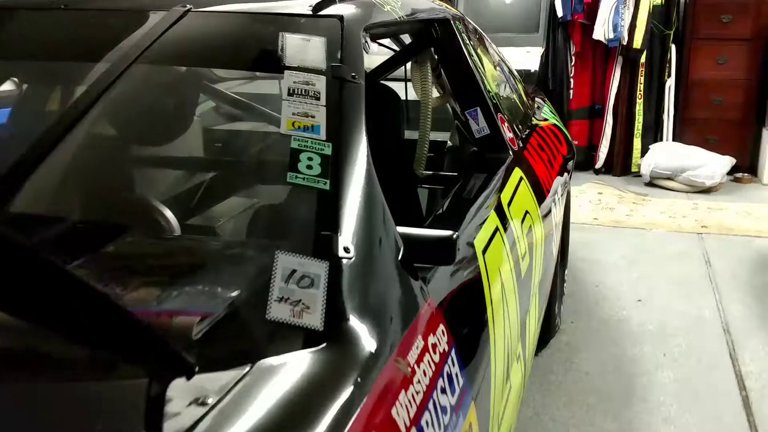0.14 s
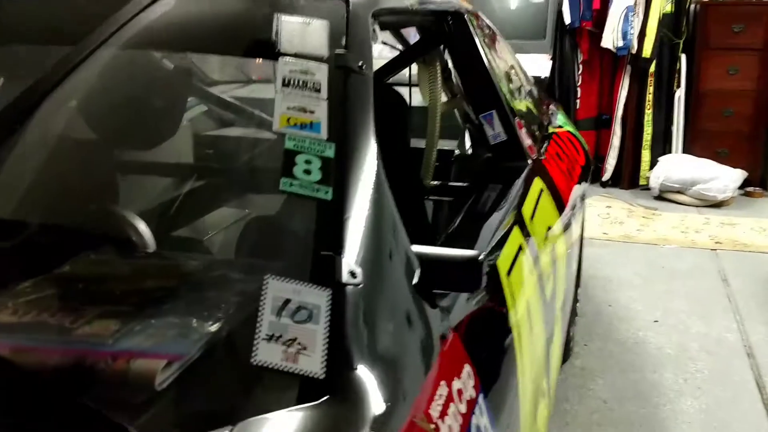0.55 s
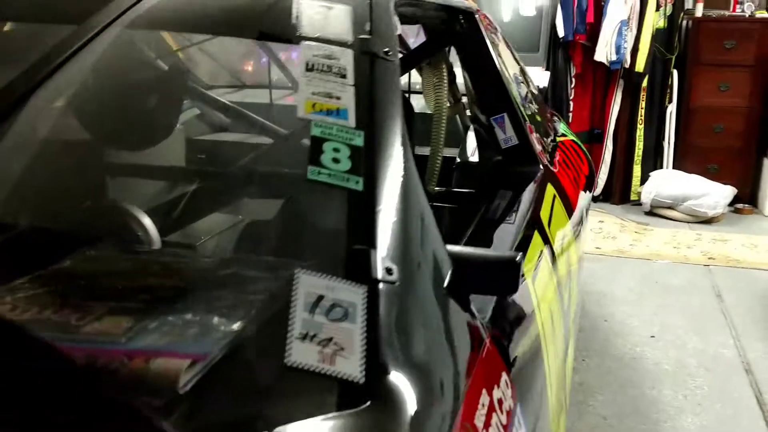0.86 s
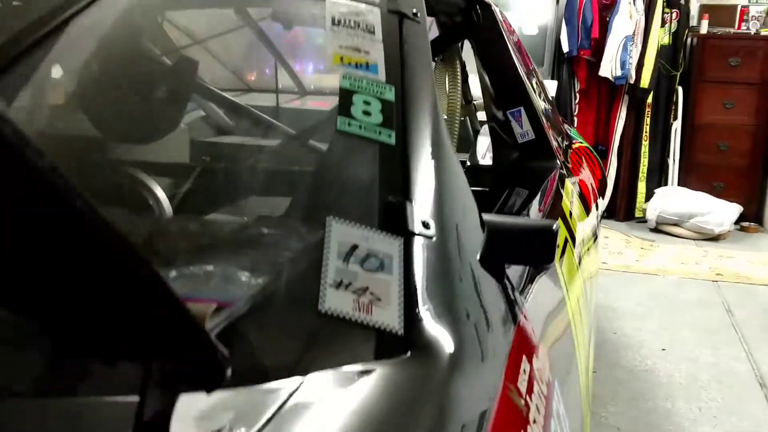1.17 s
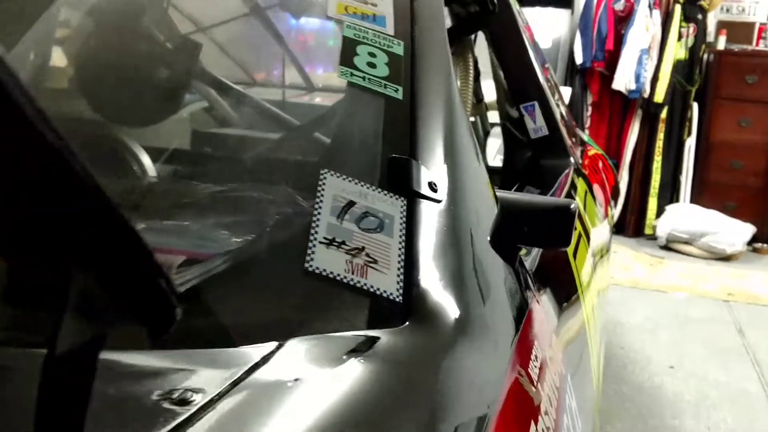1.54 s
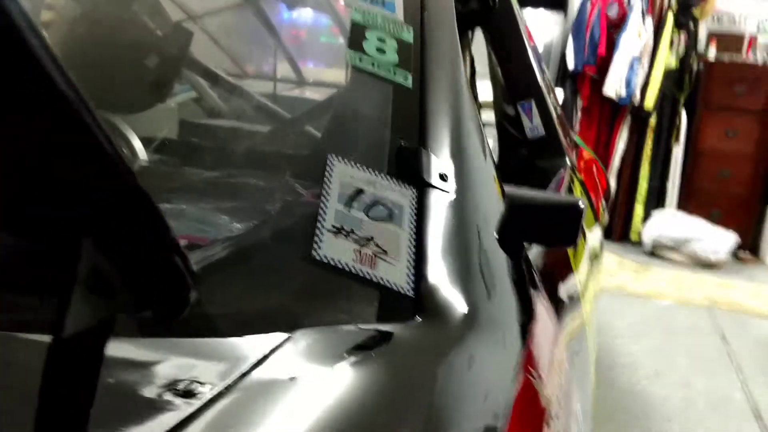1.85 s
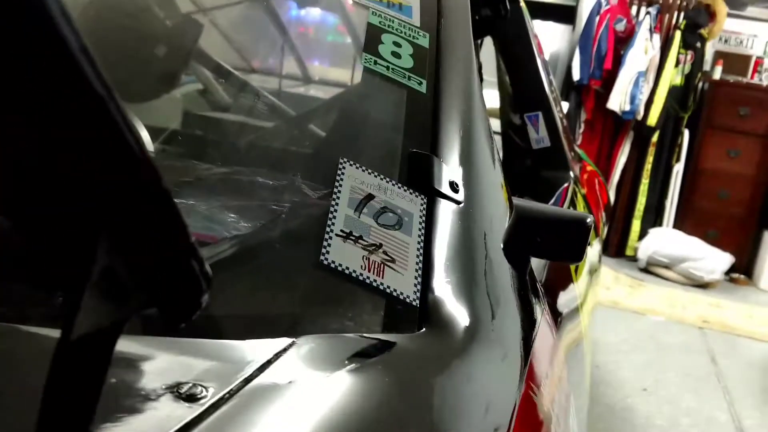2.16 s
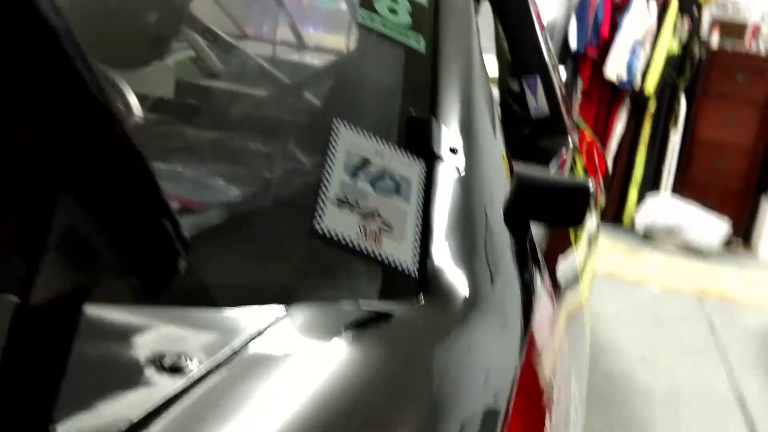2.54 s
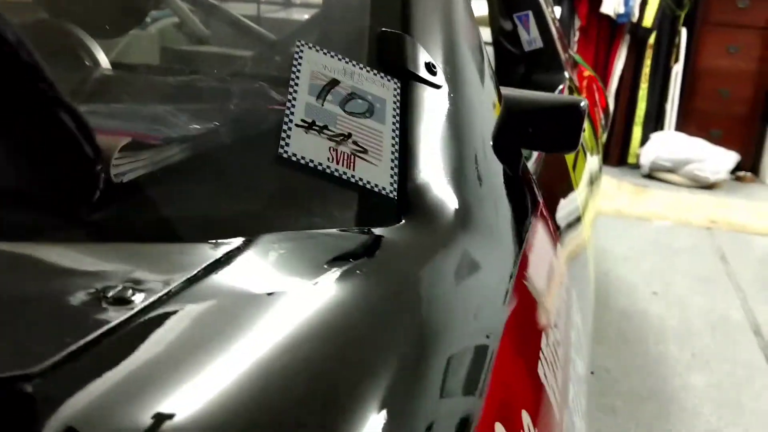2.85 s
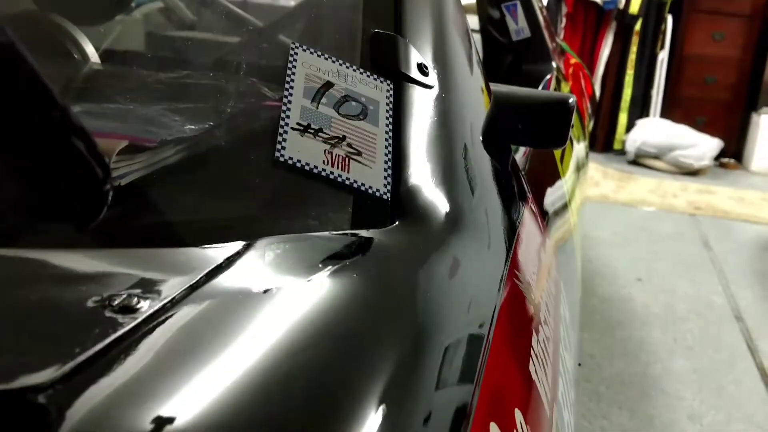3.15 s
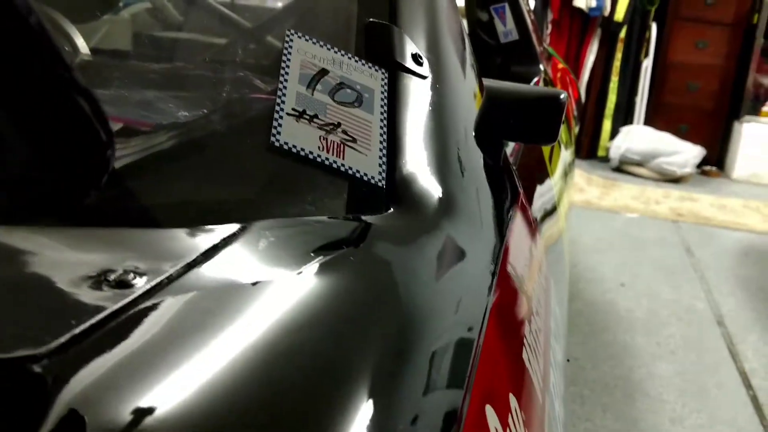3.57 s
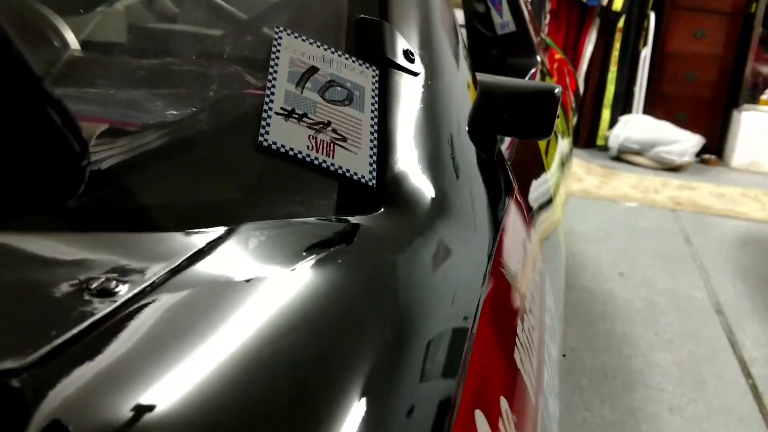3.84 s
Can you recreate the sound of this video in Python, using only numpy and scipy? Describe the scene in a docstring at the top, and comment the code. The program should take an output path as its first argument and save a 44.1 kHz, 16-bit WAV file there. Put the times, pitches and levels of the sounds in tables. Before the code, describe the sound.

After about 0.3 s of silence, a race car engine fades in, reaching full level near 0.7 s. It lopes at idle through open exhausts: uneven gassy cracks, rough barks and low booms over weaker rapid firings and faint valve patter. Sharp dry snaps stand out, notably around 0.8, 1.0, 3.3 and 3.45 s. A brief throttle blip near 3.6 s rings higher. Garage walls reverberate in wide stereo; the engine continues to the end.

```python
"""After 0.31 s of silence a race engine with open exhausts fades in, loping at idle in a garage.
From the start, strong firings crack unevenly over a roll of weak ones: noisy gas, barking pipes,
a low boom; valve gear patters and noise tails make the walls ring on. Single resonances then
swell out, sharp dry snaps cut through, and near 3.6 s a throttle blip adds a higher ringing push.
A widener subtracts a short delayed copy of each channel from the other."""
import sys
import numpy as np
from scipy import signal
from scipy.fft import rfft, irfft, next_fast_len
from scipy.io import wavfile
from scipy.ndimage import uniform_filter1d

SR = 44100
rng = np.random.default_rng(int(sys.argv[2]) if len(sys.argv) > 2 else 0)


def attenuation_scalar(level_db):
    """Turn a level in dB into a linear amplitude multiplier (20 dB per decade)."""
    decades = np.asarray(level_db, float) / 20
    return 10 ** decades


def persist_wave(psi):
    """Save psi, clipped to +-1, as 16-bit WAV."""
    counts = np.round(np.clip(psi, -1, 1) * 32767).astype(np.int16)
    wavfile.write(sys.argv[1], SR, np.atleast_2d(counts).T)


N = 176400


def evened(x):
    """Scales a signal to an rms of one."""
    return x / np.sqrt(np.mean(x ** 2) + 1e-20)


def smooth_noise(seconds):
    """Noise averaged over the given time, for slow random movement."""
    return uniform_filter1d(rng.standard_normal(N), int(seconds * SR))


def read(points, hz):
    """Reads a curve along a logarithmic frequency axis."""
    f, value = np.transpose(points)
    return np.interp(np.log(hz + 1), np.log(f + 1), value)


def shaped(x, response):
    """Multiplies the spectrum by response(hz)."""
    size = next_fast_len(x.shape[-1] + 4096)
    spectrum = rfft(x, size) * response(np.fft.rfftfreq(size, 1 / SR))
    return irfft(spectrum, size)[..., :x.shape[-1]]


def ring(x, modes):
    """Sum of resonances, each applied twice, brought to an rms of one."""
    def response(hz):
        total = 0
        for f, width, db in modes:
            detune = (hz / f - f / (hz + 1)) * f / (2 * abs(width))
            total = total + attenuation_scalar(db) / (1 + 1j * detune) ** 2
        return total
    return evened(shaped(x, response))


# Spectrum of escaping gas, also used for the ticks: f/Hz, level/dB (per Hz)
GAS_SPECTRUM = [(600, -5.5), (1300, -9.5), (2200, -3), (3500, -6.5), (5000, 0), (8000, -3.5), (10000, -4.5),
                (12000, -6.5), (14000, -7.5), (15800, -8)]


def gas_db(hz):
    """Colour of turbulent gas, as a level in dB at each frequency."""
    return read(GAS_SPECTRUM, hz)


# Strength of the weak firings over time: t/s, level/dB
ROLL = [(0.3, -18.5), (0.6, -16), (0.82, -21.5), (0.86, -26), (1.04, -15.5), (1.07, -26), (1.28, -27),
        (1.52, -23.5), (1.78, -23), (2.17, -18.5), (2.26, -21), (2.37, -19.5), (2.44, -49), (2.46, -24),
        (2.97, -20.5), (3.21, -22), (3.61, -22), (3.64, -22), (4.0, -24.5)]


def weak_roll():
    """Weak firings at a jittered rate, as click trains for crack, bark and boom."""
    per_s, jitter, spread_db = 65, 0.5, 0.5  # jitter: share of the mean interval
    shares = attenuation_scalar([[-14], [-2], [-2]])  # crack, bark, boom
    draw = rng.standard_normal((400, 2))
    s = (np.arange(400) + jitter * draw[:, 0]) / per_s
    db = np.interp(s, *np.transpose(ROLL)) + spread_db * draw[:, 1]
    keep = (s > 0) & (s < (N - 1) / SR)
    train = np.zeros((3, N))
    train[:, (s[keep] * SR).astype(int)] += shares * attenuation_scalar(db[keep])
    return train


# Strong firings: t/s, crack level/dB, bark level/dB, boom level/dB
FIRINGS = [(0.259, 2.5, -15, -44), (.317, -56, -12.5, -47), (.375, -5.5, -39, -43), (0.429, -6.5, -13, -24),
           (0.469, -5, -22, -21), (.535, -3.5, -15, -22), (0.599, -3.5, -47, -36), (0.6324, -7, -36, -33),
           (0.6614, -8.5, -14, -49), (0.7188, -6.5, -33, -21), (0.7569, -2.5, -9, -44),
           (0.8162, -4, -17, -28), (0.9575, -1.5, -11.5, -18), (1.0306, -10.5, -15, -23),
           (1.0844, -2.5, -11.5, -33), (1.161, -1.5, -6.5, -35), (1.1798, -5.5, -22, -12.5),
           (1.2388, -35, -9.5, -26.5), (1.2567, -0.5, -9.5, -12), (1.3354, -8.5, -14, -14.5),
           (1.484, -12, -22, -37), (1.53, -19, -29, -36), (1.5758, -8.5, -14.5, -36), (1.6, -15, -25, -29),
           (1.6818, -8, -11.5, -16), (1.6983, -4, -13.5, -22), (1.7596, -5, -10, -15),
           (1.7911, -9, -14, -15), (1.862, 0, -12.5, -21), (1.9146, -42, -12, -15), (1.9449, 0, -12.5, -17),
           (1.9906, -29, -28, -29), (2.1051, -5, -13, -36), (2.1625, -12.5, -57, -27),
           (2.209, -4.5, -10.5, -12.5), (2.3211, -3.5, -9.5, -30), (2.377, -6, -14, -14),
           (2.4146, -3, -11.5, -15), (2.4293, -32, -21, -33), (2.5228, -9, -15, -19),
           (2.6115, -16, -68, -19.5), (2.7064, -8, -12.5, -60), (2.73, -8.5, -42, -19),
           (2.7801, -3.5, -9.5, -15), (2.8175, -11, -35, -65), (2.87, -1, -13, -14),
           (2.8894, -28, -40, -41), (2.9475, -8, -10.5, -20), (2.9722, -8.5, -20, -16.5),
           (3.0524, -9, -13.5, -22.5), (3.0839, -6.5, -14.5, -30), (3.2071, -5.5, -13, -74),
           (3.277, -14, -20, -35), (3.2907, -2, -13, -28), (3.33, -6, -20, -25), (3.3932, -4.5, -9.5, -17),
           (3.4326, 0.5, -9, -16), (3.4704, -16, -15, -33), (3.5059, -1, -6, -16.5), (3.5893, -9, -6, -24),
           (3.6269, -3, -22, -17.5), (3.6681, -28.5, -7, -27), (3.6972, -17, -21, -14.5),
           (3.7476, -15, -19, -27), (3.7888, -23, -20.5, -14), (3.8673, -15, -26, -16.5),
           (3.9544, -14.5, -12.5, -16.5), (3.9844, -9.5, -7, -36)]


def strong_firings():
    """Unevenly spaced hard firings, as click trains for crack, bark and boom."""
    train = np.zeros((3, N))
    for s, *db in FIRINGS:
        train[:, min(int(s * SR), N - 1)] += attenuation_scalar(db)
    return train


def gas_blasts(crack, bark):
    """Each firing releases noisy gas that rises, dies away and sputters; for crack and bark."""
    rise_s, decay_s = 0.007, 0.013
    lead_s = 0.0093  # gas starts to hiss before the front arrives
    grit_db, grit_s = 1.8, 0.003  # turbulent gas sputters in short grains
    t = np.arange(4000) / SR
    blast = (1 - np.exp(-t / rise_s)) ** 2 * np.exp(-t / decay_s)
    trains = np.array([np.roll(crack, -int(lead_s * SR)), bark])
    swell = signal.oaconvolve(trains, blast[None], axes=1)[:, :N]
    gas = rng.standard_normal((2, N)) * swell
    return gas * attenuation_scalar(grit_db * evened(smooth_noise(grit_s)))


def hiss(gas):
    """The crack: gas noise given its spectrum, with a little random flicker in tone."""
    flicker_db = 1.05
    hz, _, z = signal.stft(gas, SR, nperseg=256)
    flicker = uniform_filter1d(rng.standard_normal(z.shape), size=14, axis=0)
    flicker = uniform_filter1d(flicker, size=10, axis=1)
    z = z * attenuation_scalar(gas_db(hz)[:, None] + flicker_db * evened(flicker))
    return evened(signal.istft(z, SR, nperseg=256)[1][:N])


# Bark resonances of pipes and garage: f/Hz, half-width at -6 dB f/Hz, level/dB
BARK_MODES = [(311, 13.3, -10.5), (382, 15.2, -2), (404, 13.3, 2), (437.2, 8.3, -1.5), (523, 45, -11),
              (630, 24, -5.5), (771, 71, -10), (889.4, 43, -10.5), (1029, 86.5, -10), (1170.5, 23, -9.5),
              (1430, 247, -19), (1660, 246, -19), (2263, 420, -20.5)]


def pipes(x):
    """The bark's resonances shift at random: a little flat, centred or a little sharp."""
    shift, hold_s = 0.026, 0.06  # shift: share of the pitch
    moment = (np.arange(N) / (hold_s * SR)).astype(int)
    state = rng.integers(-1, 2, N)[moment]
    total = np.zeros(N)
    for k in (-1, 0, 1):
        part = x * (state == k)
        modes = [(f * (1 + shift * k), width, db) for f, width, db in BARK_MODES]
        total += np.sqrt(np.mean(part ** 2)) * ring(part, modes)
    return evened(total)


# Low resonances of pipes and garage: f/Hz, half-width at -6 dB f/Hz, level/dB
BOOM_MODES = [(60, 10, -11), (82, 14, -6), (106, 9, -1), (145, 10, -2), (178, 7, -6), (217, 9, -12),
              (250, 12, -11), (285, 12, -13)]


def low_push(boom):
    """Each firing pushes the low resonances, which boom."""
    return ring(boom, BOOM_MODES)


def clatter():
    """Valve gear and intake: a dense steady patter of small random ticks."""
    per_s = 2800
    ticks = rng.standard_normal(N) * (rng.random(N) < per_s / SR)
    return evened(shaped(ticks, lambda hz: attenuation_scalar(gas_db(hz))))


# Reverberation time of the garage: f/Hz, t60 t/s
GARAGE_T60 = [(100, 0.38), (250, 0.71), (400, 0.72), (1500, 0.55), (5000, 0.63), (14000, 0.48)]


def garage(x):
    """Eight pairs of noise tails, fed in turn, each band dying at its own speed; mid and side."""
    build_s = 0.0083  # time for the tail to fill
    turns_per_s = 30  # steps from one tail pair to the next
    hz, t, z = signal.stft(rng.standard_normal((8, 2, SR)), SR, nperseg=512)
    t60 = read(GARAGE_T60, hz)[:, None]
    tails = signal.istft(z * attenuation_scalar(-60 * t / t60) / np.sqrt(t60), SR, nperseg=512)[1]
    tails *= 1 - np.exp(-np.arange(tails.shape[-1]) / (build_s * SR))
    tails /= np.linalg.norm(tails, axis=-1, keepdims=True)
    turn = np.arange(N) / SR * turns_per_s
    wet = np.zeros((2, N))
    for k, tail in enumerate(tails):
        feed = np.cos(np.pi / 2 * np.clip((turn - k) % 8 - 4, -1, 1)) * x
        wet += signal.fftconvolve(feed[None], tail, axes=1)[:, :N]
    return wet


# Direct sound over the tail: f/Hz, level/dB
DIRECT = [(100, 3.5), (250, 2), (600, 0), (1500, -1), (4000, -2), (14000, -3.5)]


def direct_path(exhaust):
    """Exhaust sound that arrives without touching the walls."""
    return shaped(exhaust, lambda hz: attenuation_scalar(read(DIRECT, hz)))


# Level of the diffuse side signal: f/Hz, level/dB
DIFFUSE_SIDE = [(60, -20), (150, -19.5), (260, -4.5), (400, -13.5), (800, -3), (1500, 0), (6000, -1),
                (15000, 0.5)]


def diffuse_side(side, direct):
    """Side signal from the garage tails plus the direct sound delayed by 97 samples."""
    return shaped(side + np.roll(direct, 97), lambda hz: attenuation_scalar(read(DIFFUSE_SIDE, hz)))


# Standing waves differ at the two ports: f/Hz, side over mid (gain ratio), phase/rad
LEAN = [(64, 0.21, -1.2), (103, 0.34, -1.68), (150, 0.25, -0.47), (190, 0.26, -1.4), (268, 0.44, -0.82),
        (322, 0.061, -1.4), (404, 0.35, -1.15), (650, 0.11, 0.051), (900, 0.013, -1)]


def standing_side(mid):
    """Side signal derived from the mid, leaning by frequency in level and phase."""
    gains, phases = [row[:2] for row in LEAN], [row[::2] for row in LEAN]
    return shaped(mid, lambda hz: read(gains, hz) * np.exp(1j * read(phases, hz)))


# Moments when one pipe or garage resonance swells out clearly:
# middle t/s, half-length t/s, f/Hz, level/dB
RINGS = [(0.55, 0.0873, 150.7, -14.5), (0.61, 0.066, 1003, -26.5), (0.64, 0.0693, 113, -9.5),
         (0.671, 0.033, 1157, -22), (0.672, 0.028, 398, -18), (0.743, 0.064, 113.1, -11),
         (0.77, 0.067, 415, -23), (0.808, 0.055, 163.5, -12), (0.816, 0.036, 630, -23),
         (0.847, 0.061, 572, -23), (0.873, 0.027, 573, -26), (0.897, 0.032, 542, -26),
         (0.98, 0.026, 1134, -23), (1.105, 0.029, 421.2, -16.5), (1.157, 0.035, 107, -9),
         (1.174, 0.024, 400.6, -9), (1.257, 0.11, 145, -6.5), (1.261, 0.027, 1023, -23),
         (1.258, 0.066, 404, -15), (1.359, 0.099, 181, -12.5), (1.703, 0.056, 370, -17),
         (1.78, 0.059, 113, -5.5), (1.797, 0.025, 609, -20), (1.801, 0.049, 393, -14.5),
         (1.868, 0.067, 167, -10.5), (1.871, 0.029, 630, -19.5), (1.97, 0.067, 1050, -29.6),
         (1.969, 0.11, 409, -16), (2.018, 0.061, 108, -11), (2.113, 0.025, 393, -16.5),
         (2.242, 0.051, 1034, -26), (2.28, 0.074, 167, -11.0), (2.33, 0.0315, 1093, -26),
         (2.334, 0.0405, 393, -28), (2.433, 0.026, 124, -9), (2.434, 0.054, 388, -21.8),
         (2.724, 0.033, 388, -21), (2.81, 0.094, 390.4, -25), (2.827, 0.054, 137, -10.5),
         (2.83, 0.051, 985, -27.5), (2.893, 0.039, 1013, -28), (2.976, 0.081, 420, -21),
         (2.978, 0.059, 1023, -25), (2.982, 0.074, 108, -4), (3.083, 0.062, 116.8, -10),
         (3.091, 0.091, 398, -19), (3.343, 0.061, 175, -3), (3.436, 0.0333, 743, -24),
         (3.451, 0.0693, 391, -18), (3.504, 0.04, 1090, -28.2), (3.511, 0.029, 624, -21),
         (3.516, 0.108, 172.4, -8), (3.526, 0.033, 255.3, -12.5), (3.533, 0.098, 113.7, -5.5),
         (3.598, 0.067, 188, -12), (3.602, 0.045, 250.6, -7), (3.61, 0.049, 775, -24),
         (3.638, 0.022, 1077, -24), (3.645, 0.11, 180, -10), (3.65, 0.15, 404, -21),
         (3.691, 0.035, 404, -16), (3.695, 0.0423, 753, -21), (3.875, 0.09, 101.4, -10.3)]


def rings():
    """Short sine swells of single resonances, wavering in pitch and breaking up unevenly."""
    waver, waver_s = 0.03107, 0.01146  # rms share by which the pitch wanders; smoothing time
    flutter_db, flutter_s = 3.0, 0.0074
    t, out = np.arange(N) / SR, np.zeros(N)
    warped = np.cumsum(1 + waver * evened(smooth_noise(waver_s))) / SR
    for (s, half, hz, db), turn in zip(RINGS, rng.random(len(RINGS))):
        near = slice(int((s - half) * SR), int((s + half) * SR))
        swell = np.cos(np.pi / 2 * (t[near] - s) / half) ** 2
        out[near] += attenuation_scalar(db) * swell * np.sin(2 * np.pi * (hz * warped[near] + turn))
    flutter = uniform_filter1d(smooth_noise(flutter_s), int(flutter_s * SR))
    return out * attenuation_scalar(flutter_db * evened(flutter))


# Sharp dry snaps heard over the exhaust: t/s, level/dB
SNAPS = [(0.661, -5), (0.819, 0), (0.959, -3), (1.179, -7), (1.271, -8.6), (1.488, -18), (1.701, -11.1),
         (1.797, -8), (1.862, -8.1), (1.988, -14), (2.228, -9), (2.322, -9.2), (2.437, -8), (2.567, -16.5),
         (2.873, -13), (3.295, 0), (3.446, -1), (3.599, -12.9)]


def snaps():
    """Very short bright bursts of gas: noise of random sign under a fast rise and decay."""
    rise_s, decay_s = 0.001, 0.002
    t, train = np.arange(800) / SR, np.zeros(N)
    for s, db in SNAPS:
        train[int(s * SR)] = attenuation_scalar(db)
    burst = (1 - np.exp(-t / rise_s)) * np.exp(-t / decay_s)
    envelope = signal.oaconvolve(train, burst)[:N]
    return shaped(envelope * rng.choice([-1., 1.], N), lambda hz: attenuation_scalar(gas_db(hz)))


# Resonances excited by the blip: f/Hz, half-width at -6 dB f/Hz, level/dB
BLIP_MODES = [(245, 65, 0.5), (316, 15, 1.5), (353, 16.3, -18), (555, 136, -7.5), (940, 470, -17)]


def blip(boom):
    """Open throttle sharpens the push, which then rings higher."""
    middle_s, width_s = 3.59, 0.13
    throttle = np.exp(-((np.arange(N) / SR - middle_s) / width_s) ** 2)
    return ring(boom * throttle, BLIP_MODES)


def engine():
    """Every firing drives a crack of gas, a rough bark in the pipes and a low push."""
    crack, bark, boom = weak_roll() + strong_firings()
    crack_gas, bark_gas = gas_blasts(crack, bark)
    rough_bark = pipes(bark_gas + 10.8 * bark)  # noise plus a clean pulse
    return (attenuation_scalar(-24) * hiss(crack_gas) + attenuation_scalar(-24.5) * rough_bark
            + attenuation_scalar(-17.5) * low_push(boom) + attenuation_scalar(-31.5) * blip(boom))


def scene():
    """Engine and snaps, heard directly and through the garage, as left and right."""
    exhaust = engine() + attenuation_scalar(-39.5) * clatter()
    snap = snaps()
    mid, side = garage(exhaust + 0.3 * snap)
    direct = direct_path(exhaust) + snap
    mid = mid + direct + rings()
    side = diffuse_side(side, direct) + standing_side(mid)
    return np.array([mid + side, mid - side]) / 2


# Left over right: f/Hz, level/dB
TILT = [(2000, 0.5), (6000, 0.5), (9000, 7), (11000, -2), (13000, -1), (15500, -7)]


def microphone(x):
    """Tilts the channels against each other, cuts the lows and limits the band."""
    low_cut_hz, edge_hz = 62, 15600

    def response(hz):
        tilt = attenuation_scalar(read(TILT, hz) * np.array([[0.5], [-0.5]]))
        low_cut = 1 / (1 + low_cut_hz / (1j * hz + 1e-3)) ** 2
        return tilt * low_cut * np.clip((edge_hz - hz) / 150, 0, 1)
    return shaped(x, response)


# Copy taken from the opposite channel: f/Hz, gain (ratio)
WIDEN = [(1100, 0.71), (2200, 0.92), (3300, .995), (4400, 0.86), (5500, 0.14), (6600, 0.43), (7700, 0.29),
         (9500, 0.039), (16000, 0.0092)]


def widener(x):
    """Subtracts a delayed copy of each channel from the other."""
    delay_s = 20 / SR
    return x - shaped(x[::-1], lambda hz: read(WIDEN, hz) * np.exp(-2j * np.pi * hz * delay_s))


def fade_in(x):
    """Silence, a quick 11 ms opening, then a gain climbing from 0.1 to full in 0.405 s."""
    t = np.arange(N) / SR - 0.31
    return x * np.clip(t / 0.011, 0, 1) * np.clip(0.1 + t / 0.45, 0, 1)


def roll_off(x):
    """The treble ends steeply here."""
    return signal.sosfilt(signal.butter(12, 16470, fs=SR, output="sos"), x)


def record(dry):
    """Microphone colour, widener and fade-in, then an input stage that rounds off peaks."""
    ceiling = 1.25
    x = fade_in(widener(microphone(dry)))
    mix = ceiling * np.tanh(x / ceiling)
    return roll_off(mix)


dry = scene()
out = record(dry)
persist_wave(out)
```